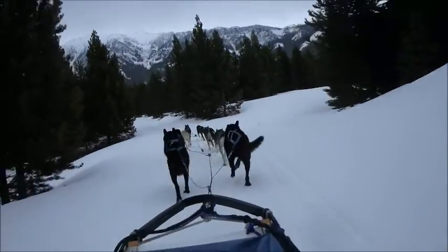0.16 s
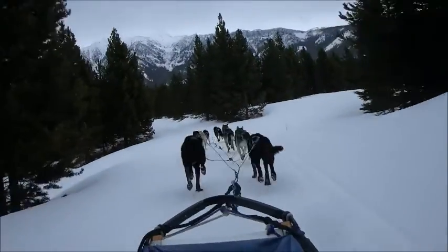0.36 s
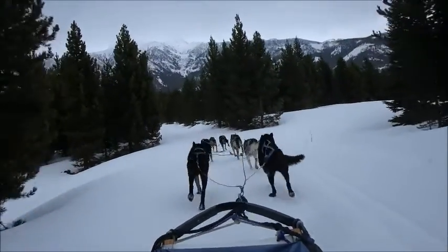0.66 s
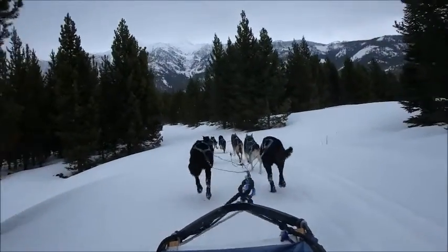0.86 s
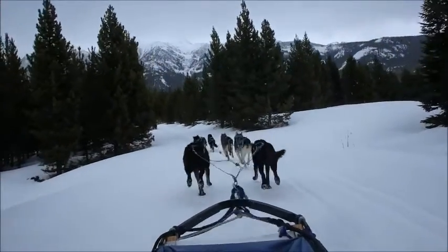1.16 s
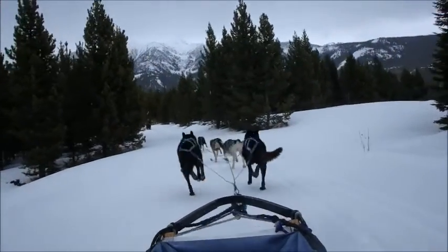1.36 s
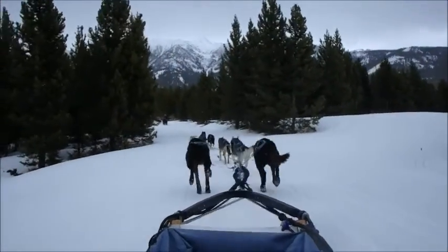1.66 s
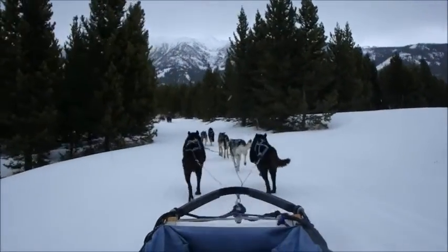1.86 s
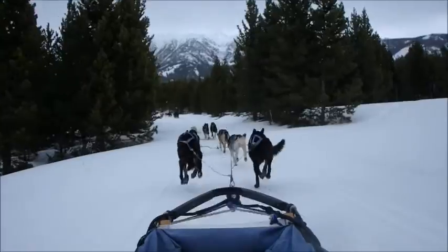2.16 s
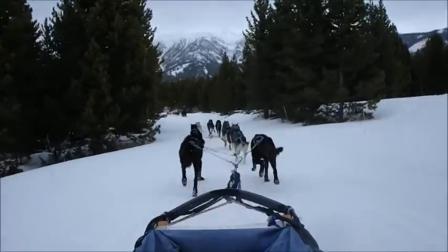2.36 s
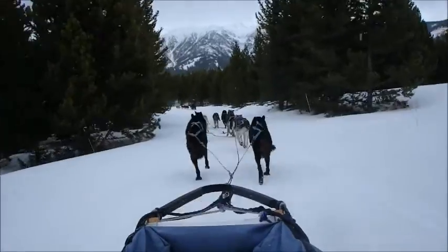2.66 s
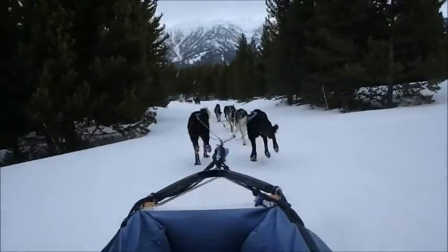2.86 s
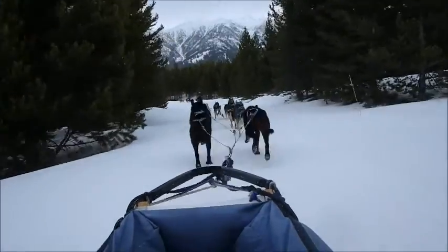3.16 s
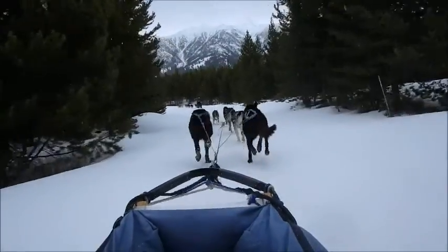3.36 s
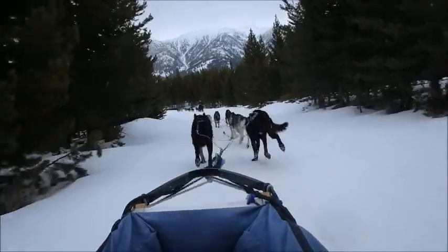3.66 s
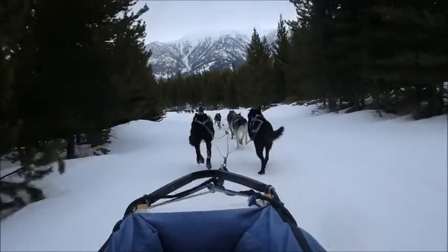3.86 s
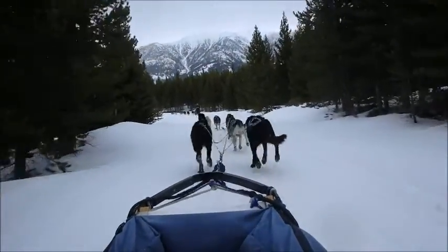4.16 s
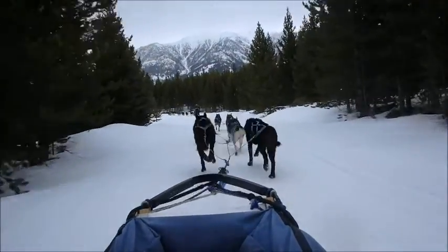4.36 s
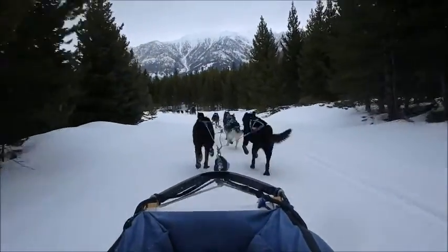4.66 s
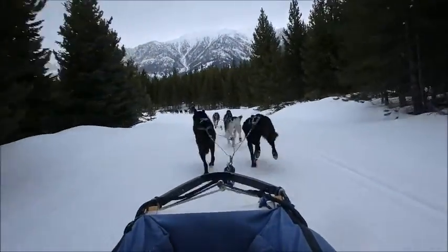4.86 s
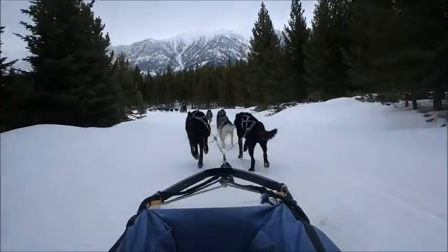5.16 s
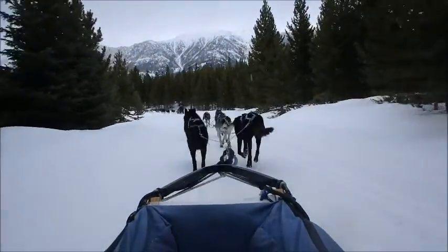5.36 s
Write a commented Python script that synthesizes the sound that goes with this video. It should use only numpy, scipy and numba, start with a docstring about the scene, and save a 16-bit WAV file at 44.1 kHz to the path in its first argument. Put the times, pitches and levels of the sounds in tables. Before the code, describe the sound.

A close, bassy sled glide on snow: steady low rumble, soft gritty scrape, irregular knocks, light clicks, and wind gusts mostly in the first half.

```python
"""Sled runners glide over packed snow: noise bands rumble in the frame, scrape and hiss, roughened by grains.
Bumps swing the frame as damped oscillations; crust crunches as puffs of band-passed noise.
Ice grains and fittings tick as bursts through resonant modes; wind buffets two ports as turbulent noise.
The steady sound climbs evenly and drops abruptly now and then. The camera held on the sled whines faintly,
notches out five narrow bands, rounds the peaks and cuts the top."""
import sys
import numpy as np
from scipy import signal
from scipy.fft import rfft, irfft, next_fast_len
from scipy.io import wavfile
from scipy.ndimage import uniform_filter1d
from numba import njit

SR = 44100
rng = np.random.default_rng(int(sys.argv[2]) if len(sys.argv) > 2 else 0)


def inscribe(sig):
    """Save sig as 16-bit PCM at rate SR to the path in sys.argv[1].

    A 1-D sig is mono; a 2-D sig holds one channel per row.
    Samples are clipped to [-1, 1] before scaling.
    """
    pcm = np.round(np.clip(np.atleast_2d(sig).T, -1, 1) * 32767)
    wavfile.write(sys.argv[1], SR, pcm.astype(np.int16))


N = 242755


def undb(db):
    """Decibel definition: 20 dB is a tenfold amplitude."""
    return 10 ** (np.asarray(db) / 20)


def unit(x):
    """Power normalisation: scale to an RMS of 1."""
    return x / np.sqrt(np.mean(x ** 2))


def along(table, hz):
    """Logarithmic frequency scale: read a (frequency_hz, value) table between its points."""
    points = np.array(table)
    return np.interp(np.log(hz), np.log(points[:, 0]), points[:, 1])


@njit
def band_pass(x, hz, width):
    """State-variable resonance: two integrators in a loop, gain 1 at the centre."""
    y, band, low = np.empty(len(x)), 0., 0.
    g, damping = np.tan(np.pi * hz / SR), width / hz
    for i in range(len(x)):
        v = (band + g * (x[i] + 1e-18 - low)) / (1 + g * (g + damping))
        band = 2 * v - band
        low = low + 2 * g * v
        y[i] = damping * v
    return y


def band_pass_twice(x, hz, width):
    """Cascaded resonance: the second pass steepens the skirts."""
    return band_pass(band_pass(x, hz, width), hz, width)


def random_levels(rate):
    """Slow random modulation: levels held 1 / rate s and slewed twice, spread near 1."""
    hold = int(SR / rate)
    steps = rng.standard_normal(N // 500)[:N // hold + 1]
    held = np.repeat(steps, hold)
    return 0.8045 * uniform_filter1d(uniform_filter1d(held, hold), hold)[:N]


def random_impulses(rate, spread_db):
    """Poisson-like process: lone impulses at random moments, some larger than the rest."""
    excess = np.minimum(rng.exponential(size=N), 3)
    return (rng.random(N) < rate / SR) * undb(spread_db * excess)


def smear(x, decay_s):
    """Exponential decay: give each impulse a tail with this time constant."""
    return signal.lfilter([1], [1, -np.exp(-1 / (decay_s * SR))], x)


# Level difference of the two ports: frequency_hz, left_minus_right_db [Hz, dB]
PORT_DIFFERENCE = [(60, -1.5), (400, -3.5), (1300, -2.5), (2600, -2), (3500, -3.5), (4300, 4), (4700, -12),
                   (5600, -0.5), (7400, -3), (9500, -2), (11000, 1.5), (13000, -3), (15000, 4)]


def port_gains(hz):
    """Interaural-style level difference: half is added on the left, half taken off on the right."""
    return undb(np.outer([.5, -.5], along(PORT_DIFFERENCE, hz)))


# Gusts on the ports: peak_s, strength_db, fall_s (to die down by 10 dB) [s, dB, s]
GUST_EVENTS = [(0.08, -22, .04), (0.18, -20.5, .03), (0.30, -17.5, 0.081), (0.439, -16.5, 0.0111),
               (0.66, -25, .04), (0.75, -24, 0.0022), (0.833, -17, 0.0552), (1.07, -17.5, .07),
               (1.447, -24, 0.1488), (1.654, -22, 0.1558), (1.796, -23.5, 0.1091), (1.985, -21, 0.1285),
               (2.235, -15.5, 0.1293), (2.42, -27, 0.109), (2.609, -23.5, 0.0711), (2.714, -21.5, 0.0424),
               (2.883, -31.5, 0.0685), (3.043, -32, 0.1181), (3.24, -31.5, 0.006)]
CALM_DB, GUST_RISE = -45, 1.038  # floor between gusts; time to rise over time to die down


def gust_strength(t):
    """Exponential growth and decay: straight slopes in dB, the strongest gust prevailing over the calm."""
    slopes = []
    for peak_s, strength_db, fall_s in GUST_EVENTS:
        distance_s = np.maximum((peak_s - t) / GUST_RISE, t - peak_s)
        slopes.append(strength_db - 10 * distance_s / fall_s)
    return np.maximum(CALM_DB, np.max(slopes, axis=0))


# Bands of turbulence: centre_hz, width_hz, level_db, growth [Hz, Hz, dB, dB per dB of gust]
WIND_BANDS = [(60.28, 63.7, -6, 0.4426), (117.84, 141.81, 4.5, 0.6342), (316.4, 263.2, -4.5, 1.301),
              (684.7, 368.9, -20, 1.625)]
GUST_DB, LEE_DB, WIND_FLUTTER_DB = -24.5, -8, 3.5  # middling gust, sheltered left port, turbulence


def wind(gust_db):
    """Turbulent pressure noise: independent eddies at each port; stronger gusts are brighter."""
    out = np.zeros((2, N))
    for port, shelter_db in zip(out, (LEE_DB, 0)):
        flutter_db = WIND_FLUTTER_DB * random_levels(45)
        for hz, width, db, growth in WIND_BANDS:
            eddies = unit(band_pass_twice(rng.standard_normal(N), hz, width))
            band_db = GUST_DB + growth * (gust_db - GUST_DB) + db
            port += undb(band_db + shelter_db + flutter_db) * eddies
    return out


WHINE_HZ, WHINE_DB = 14835, -68  # RMS level, before the climb and drops


def whine(t):
    """Pure tone: the camera's faint steady sinusoid, alike in both ports."""
    return np.sqrt(2) * undb(WHINE_DB) * np.sin(2 * np.pi * WHINE_HZ * t)


# Modes excited by a tick, low to high: centre_hz, width_hz, burst_decay_s [Hz, Hz, s]
TICK_RESONANCES = [ (2475.6, 1291.8, 0.001121), (3538.9, 1262, 0.0012164), (6430, 4075.5, 0.0009325),
                   (11176, 13360, 0.001176)]
TICK_RING_HZ, TICK_RING_WIDTH_HZ, TICK_RING_DB = 3899.5, 203.3, -8


def tick_resonance(excite):
    """Modal resonance: each mode filters its own burst, and the camera shell rings with the sum."""
    sound = 0
    for x, (hz, width, _) in zip(excite, TICK_RESONANCES):
        # a narrow mode passes less of its burst, so restore the strength of the blow
        sound = sound + np.sqrt(SR / width) * band_pass_twice(x, hz, width)
    return sound + undb(TICK_RING_DB) * band_pass(sound, TICK_RING_HZ, TICK_RING_WIDTH_HZ)


# Loud ticks: start_s, blow_db, centre_hz, spread_octaves (from the centre to 10 dB down),
# left_minus_right_db [s, dB, Hz, octaves, dB]
LOUD_TICKS = [(0.0354, -42, 6200, 0.98, -1.0), (0.0409, -33, 5200, 0.94, -2.0),
              (0.221, -36, 8700, 3.0, -6.0), (0.4688, -35, 3300, 0.99, -1.0),
              (0.5205, -32, 1900, 1.46, -1.0), (0.5288, -33, 5000, 1.43, -2.0),
              (0.6042, -37, 3500, 1.58, -4.0), (0.6422, -24, 1700, 1.35, -3.0),
              (0.6796, -32, 1700, 2.39, -2.0), (0.7069, -25, 1700, 1.66, -2.0),
              (0.7524, -22, 4300, 0.96, 0.4), (0.7655, -33, 3400, 3.0, -5.0), (0.78, -34, 5900, 1.6, -1.0),
              (0.7967, -23, 4200, 1.04, 4.0), (0.8181, -35, 1800, 3.0, -9.0),
              (0.9103, -31, 5500, 0.85, 2.0), (1.0126, -26, 1800, 3.0, -2.0),
              (1.0191, -33, 2000, 2.68, -3.0), (1.0269, -27, 1700, 1.92, 2.0),
              (1.086, -28, 1700, 1.88, -2.0), (1.09, -31, 5300, 1.6, 1.0), (1.1325, -37, 5300, 1.29, -1.0),
              (1.1694, -29, 2300, 1.77, 0.4), (1.1845, -32, 3800, 1.98, -1.0),
              (1.2074, -23, 2500, 1.4, -2.0), (1.302, -39, 2900, 1.65, 2.0), (1.3156, -36, 2000, 3.0, 0.4),
              (1.4928, -32, 4200, 1.73, -4.0), (1.5295, -37, 4300, 1.32, -1.0),
              (1.6748, -20, 1700, 1.67, -1.0), (1.687, -33, 1700, 2.2, -2.0), (1.759, -36, 7300, 1.4, -1.0),
              (1.8425, -33, 8000, 1.73, -2.0), (1.8509, -30, 1700, 1.81, -1.0),
              (1.9112, -26, 5700, 0.95, -13.0), (1.9785, -32, 1700, 2.58, -3.0),
              (2.2164, -32, 5200, 1.21, 1.0), (2.2727, -36, 7500, 2.42, -3.0),
              (2.5369, -35, 2800, 3.0, -3.0), (2.5581, -27, 3000, 2.65, -1.0),
              (2.5695, -34, 5600, 2.02, -6.0), (2.6601, -32, 1700, 2.62, -2.0),
              (2.7974, -18, 7500, 3.0, 1.0), (2.9944, -32, 4800, 1.0, -10.0),
              (3.1785, -37, 4500, 1.57, -4.0), (3.3458, -29, 3400, 0.96, -2.0),
              (3.4567, -23, 1700, 1.18, -5.0), (3.6661, -19, 13300, 1.97, 11.0),
              (3.857, -36, 3600, 1.4, -2.0), (3.892, -37, 4100, 1.79, -3.0), (3.94, -37, 7500, 3.0, -8.0),
              (4.1515, -33, 4600, 3.0, -6.0), (4.2587, -30, 3800, 1.32, -2.0),
              (4.29, -29, 6500, 1.07, -5.0), (4.3157, -24, 2900, 1.08, -1.0),
              (4.3218, -24, 13300, 2.61, 1.0), (4.3499, -31, 8300, 2.48, -2.0),
              (4.3542, -32, 4700, 1.84, -2.0), (4.3628, -27, 1700, 2.22, -2.0),
              (4.3897, -30, 3000, 1.35, 0.4), (4.3965, -26, 2000, 1.56, -2.0),
              (4.4041, -32, 4100, 1.24, -1.0), (4.4663, -16, 12700, 2.09, -5.0),
              (4.4712, -27, 13100, 1.55, 0.4), (4.5509, -28, 6300, 0.82, -3.0),
              (4.6412, -27, 1700, 2.66, 0.4), (4.6661, -27, 1700, 2.05, -3.0),
              (4.7034, -27, 1700, 2.25, 2.0), (4.7517, -30, 3400, 3.0, -1.0),
              (5.0629, -33, 3400, 1.48, -3.0)]
# How readily each mode answers a loud tick: level_db [dB]
TICK_RESPONSE_DB = [0.8, -1.5, -3.5, -8]
# How strongly the crackle drives each mode: level_db [dB]
CRACKLE_RESPONSE_DB = [-1, -5, -7, -15]
# Port-specific noise against shared noise in each mode: amplitude_ratio [1]
TICK_UNSHARED = [0.4, 0.85, 1.2, 1.5]
TICK_SNAP = 3.4295  # first impulse over the burst
CRACKLE_RATE, CRACKLE_DB, CRACKLE_SPREAD_DB = 70, -45.5, 2.2  # small ticks per s, least blow, spread
CRACKLE_COLOUR_DB = 3.5  # random change of each mode


def ticks(spray_db):
    """Impulse excitation: listed loud blows, and a crackle of small ones that follows the spray."""
    start_s, blow_db, centre_hz, spread, pan_db = np.transpose(LOUD_TICKS)
    octaves = np.log2(np.array(TICK_RESONANCES)[:, :1] / centre_hz)
    modes_db = blow_db + np.array(TICK_RESPONSE_DB)[:, None] - 10 * (octaves / spread) ** 2
    at = (start_s * SR).astype(int)
    small = random_impulses(CRACKLE_RATE, CRACKLE_SPREAD_DB)
    small = small * undb(CRACKLE_DB + spray_db - spray_db.mean())
    colour, shared, *own = rng.standard_normal((4, len(TICK_RESONANCES), N))
    colour_db = CRACKLE_COLOUR_DB * np.clip(colour, -2, 2) + np.array(CRACKLE_RESPONSE_DB)[:, None]
    apart = np.array(TICK_UNSHARED)[:, None]
    out = []
    for side, noise in zip((.5, -.5), own):
        blows = small * undb(colour_db)
        blows[:, at] = undb(modes_db + side * pan_db)
        bursts = np.array([smear(b, decay) for b, (_, _, decay) in zip(blows, TICK_RESONANCES)])
        rattle = (np.sign(shared) + apart * np.sign(noise)) / np.sqrt(1 + apart ** 2)
        out.append(tick_resonance(bursts * rattle + TICK_SNAP * blows))
    return np.array(out)


# Lumps of crust breaking under a runner: start_s, peak_db (before the port gains), centre_hz [s, dB, Hz]
CRUST_BREAKS = [(0.173, -23.5, 575), (0.522, -24, 608), (0.583, -22, 533.5), (0.601, -24, 654),
                (0.638, -22.5, 657), (1.159, -22.5, 455.8), (1.782, -25, 651), (1.85, -16.5, 527.4),
                (1.95, -18.5, 521.7), (1.999, -16.5, 641.7), (2.136, -19, 715.4), (2.203, -15, 461.7),
                (2.527, -18, 588.6), (2.669, -20, 711), (2.838, -22, 630.6), (2.88, -19.5, 598),
                (2.997, -17, 452.2), (3.453, -23.5, 619.8), (3.927, -26, 646), (4.14, -22.5, 634.6),
                (4.414, -18.5, 768.5), (4.628, -20, 451), (5.049, -24, 630), (5.202, -15.5, 459.5),
                (5.275, -18.5, 553.7)]
CRUNCH_WIDTH, CRUNCH_S = 0.91, 0.0044106  # bandwidth over centre; time to swell to the full


def crunches():
    """Brittle fracture: each lump gives a dull puff of band-passed noise, swelling and fading."""
    out, t = np.zeros(N + SR), np.arange(SR // 10) / SR
    envelope = t * np.exp(-t / CRUNCH_S)
    noise = rng.standard_normal((len(CRUST_BREAKS), len(t)))
    for (start_s, peak_db, hz), burst in zip(CRUST_BREAKS, noise):
        puff = band_pass_twice(burst * envelope, hz, CRUNCH_WIDTH * hz)
        i = int(start_s * SR)
        out[i:i + len(t)] += undb(peak_db) * puff / np.max(np.abs(puff))
    return out[:N] * port_gains(713)


# Bumps in the trail: swell_s (near the fullest swing), peak_db (before the port gains), pitch_hz [s, dB, Hz]
TRAIL_BUMPS = [(0.123, -8, 116), (0.349, -14, 113), (0.468, -10, 122.6), (0.528, -14, 210),
               (0.572, -11.5, 209.8), (0.651, -14, 128), (0.818, -14.5, 124.8), (1.048, -10, 125.3),
               (1.107, -9.5, 166.5), (1.419, -13.5, 147), (1.519, -10, 205.2), (1.78, -8, 136),
               (1.842, -6.5, 187), (1.948, -11.5, 115.5), (2.279, -9.5, 157.9), (2.348, -14, 209),
               (2.473, -13.5, 137.6), (2.687, -14, 207), (2.891, -5, 115.3), (2.949, -7.5, 131.7),
               (3.093, -14, 173), (3.449, -13.5, 112), (3.697, -7.5, 149.2), (3.827, -8, 119.9),
               (3.87, -9, 139.8), (4.099, -8.5, 131.1), (4.32, -10, 215.5), (4.421, -14, 143),
               (4.501, -9.5, 150.3), (4.798, -14, 223.8), (4.891, -9, 165.2), (5.043, -10.5, 119.6),
               (5.103, -6, 173.4), (5.178, -6.5, 135), (5.279, -12, 153.5), (5.399, -10, 182),
               (5.461, -12.5, 139.3)]
JOLT_RISE_S, JOLT_T60_S = 0.0079887, 0.059894  # start ahead of swell_s; 60 dB time of the exponential


def jolts():
    """Damped oscillation: each bump swings the frame for a few cycles, swelling over the first."""
    out, t = np.zeros(N + SR), np.arange(SR // 5) / SR
    envelope = t * np.exp(-np.log(1000) * t / JOLT_T60_S)
    for swell_s, peak_db, hz in TRAIL_BUMPS:
        swing = envelope * np.sin(2 * np.pi * hz * t)
        i = int((swell_s - JOLT_RISE_S) * SR)
        out[i:i + len(t)] += undb(peak_db) * swing / np.max(np.abs(swing))
    return out[:N] * port_gains(160)


# Sudden drops of all the steady sound: start_s, depth_db [s, dB]
LEVEL_DROPS = [(1.119, 4.5), (1.52, 1.5), (1.868, 3), (2.2, 2), (2.288, 4), (2.89, 3.5), (3.045, 5.5),
               (4.45, 3.5), (4.6, 3), (5.18, 2.5), (5.402, 5)]
START_DB, CLIMB_DB_PER_S, DROP_S = -6.9, 8, 0.00577  # DROP_S: how long a drop takes


def climb_and_drops(t):
    """Sawtooth-like level modulation: an even climb in dB, cut back at each drop."""
    db = START_DB + CLIMB_DB_PER_S * t
    for start_s, depth_db in LEVEL_DROPS:
        db = db - depth_db * (t > start_s)
    return uniform_filter1d(db, int(DROP_S * SR))


# Runners on the trail, before the climb and drops: time_s, rumble_db, scrape_db, spray_db [s, dB, dB, dB]
RUNNER_LEVELS = [(0, -17, -33.5, -49), (0.1, -18.5, -28, -50.5), (0.52, -16.5, -36, -53.5),
                 (0.7, -18, -33.5, -52.5), (0.85, -19.5, -35, -54), (1.08, -17.5, -34.5, -52),
                 (1.3, -16.5, -32.5, -53), (1.75, -19, -33.5, -54), (1.95, -18.5, -27, -54),
                 (2.2, -17.5, -24, -53), (2.45, -17.5, -25, -53), (2.75, -18, -27, -53),
                 (3.05, -13, -26.5, -52), (3.3, -14, -29, -54), (3.6, -14.5, -28.5, -52),
                 (3.75, -20, -31, -53), (3.95, -18, -28.5, -54), (4.22, -20, -34.5, -55),
                 (4.4, -21, -32.5, -54), (4.55, -14.5, -28.5, -52), (4.72, -19, -29.5, -51),
                 (4.9, -19, -31, -53), (5.1, -19.5, -31, -54), (5.35, -19, -29, -52.5),
                 (5.5, -14, -28, -51)]
# Deepest shaking of the sled, before the climb and drops: time_s, level_db [s, dB]
SWAY_LEVELS = [(0.0, -27), (0.07, -16), (0.45, -23), (0.69, -37), (0.87, -27.5), (1.35, -32), (1.55, -26),
               (2.45, -36), (2.64, -22), (2.82, -33), (3.25, -27), (3.68, -34), (3.95, -28.5), (4.91, -35),
               (5.2, -32), (5.5, -38)]
HISS_DB, HISS_PER_SCRAPE, SCRAPE_DB = -43, 0.421, -31  # hiss at a middling scrape; dB per dB; that scrape
SWISH_S, SWISH_HALF_S, SWISH_DB = 4.94, .035, 7  # soft treble swish: middle, half length, rise of the spray


def runner_levels(t):
    """Friction strength: sway, rumble, scrape, hiss and spray in dB; the hiss grows with the scrape."""
    time_s, *columns = np.transpose(RUNNER_LEVELS)
    rumble_db, scrape_db, spray_db = (np.interp(t, time_s, c) for c in columns)
    sway_db = np.interp(t, *np.transpose(SWAY_LEVELS))
    hiss_db = HISS_DB + HISS_PER_SCRAPE * (scrape_db - SCRAPE_DB)
    spray_db = spray_db + SWISH_DB * np.exp(-((t - SWISH_S) / SWISH_HALF_S) ** 2)
    return [sway_db, rumble_db, scrape_db, hiss_db, spray_db]


# Sway, rumble, scrape, hiss, spray: top_hz, flicker_db, flicker_rate_per_s, grain_share [Hz, dB, 1/s, 0-1]
GLIDE_LAYERS = [(85, 0, 3.33, 0.1), (330, 0.8, 10, 0.07), (2200, 0.8613, 18, 0.16), (4400, 0.7, 25, 0.1),
                (15000, 0.5, 58, 0)]
# Spectrum of sway, rumble and scrape: frequency_hz, density_db [Hz, dB per Hz]
BODY_SPECTRUM = [(18, -27.5), (30, -32), (50, -17.5), (75, -16), (100, -6.5), (130, -0.5), (175, -3.5),
                 (215, -2), (270, -9.5), (340, -16.5), (520, -22), (650, -19), (910, -29.5), (1100, -28),
                 (1570, -32.5), (2100, -42)]
# Spectrum of hiss and spray: frequency_hz, density_db [Hz, dB per Hz]
SNOW_SPECTRUM = [(2100, -14), (2320, 2.5), (2800, 2.5), (3300, -3.5), (3850, -2), (4300, -7), (4700, -17),
                 (5800, -4.5), (6300, -16), (7300, -9.5), (9500, -15.5), (12500, -18.5), (14700, -21.5),
                 (16500, -36)]
# Likeness of the two ports: frequency_hz, likeness [Hz, 0-1]
PORT_LIKENESS = [(30, 0.88), (60, 0.95), (130, 0.99), (300, 1), (800, 1), (1400, 1), (2600, 0.96),
                 (3500, 0.95), (4200, 0.57), (6800, 0.93), (8500, 0.22), (10000, 0.27), (12000, 0),
                 (14500, 0.62)]
LEAD_S = .000012  # the left port is nearer the runners
GRAIN_RATE, GRAIN_SPREAD_DB, GRAIN_S = 360, 7, 0.0008037  # crushes per s, spread of size, decay


def glide(levels_db):
    """Sliding friction: third-octave noise bands, roughened by crushed grains, each layer at its own level."""
    size = next_fast_len(N)
    f = np.maximum(np.arange(size // 2 + 1) * SR / size, 1)
    # the snow spectrum continues from the end of the body spectrum
    snow_db = along(SNOW_SPECTRUM, f) - SNOW_SPECTRUM[0][1] + BODY_SPECTRUM[-1][1]
    colour = undb(np.where(f < SNOW_SPECTRUM[0][0], along(BODY_SPECTRUM, f), snow_db))
    like = np.clip(along(PORT_LIKENESS, f), 0, 1)
    ports = port_gains(f) * np.exp(2j * np.pi * np.outer([LEAD_S, 0], f))
    # one crush excites all bands at once
    grains = unit(smear(random_impulses(GRAIN_RATE, GRAIN_SPREAD_DB), GRAIN_S))
    centres = 25 * 2 ** (np.arange(29) / 3)
    out, low = 0, 0
    for (top, flicker_db, rate, share), db in zip(GLIDE_LAYERS, levels_db):
        layer, shared, share = 0, random_levels(rate / 2), np.clip(share, 0, 1)
        roughness = np.sqrt(1 - share + share * grains ** 2)
        for hz in centres[(centres >= low) & (centres < top * 1.1)]:
            strength = undb(flicker_db * (shared + random_levels(rate))) * roughness
            mid, side = rfft(strength * rng.standard_normal((2, N)), size)
            band = colour * np.cos(np.pi / 2 * np.clip(3 * np.log2(f / hz), -1, 1))
            opposed = side * np.array([[1], [-1]])
            layer = layer + band * (np.sqrt(1 + like) * mid + np.sqrt(1 - like) * opposed)
        layer = irfft(layer * ports, size)[:, :N]
        out = out + undb(db) * layer / np.std(layer.mean(axis=0))
        low = top * 1.1
    return out


def scene():
    """Superposition: the climb and drops scale glide and whine, and their level also drives the crackle."""
    t = np.arange(N) / SR
    levels_db = runner_levels(t)
    spray_db, swell_db = levels_db[-1], climb_and_drops(t)
    steady = undb(swell_db) * (glide(levels_db) + whine(t))
    return wind(gust_strength(t)) + ticks(spray_db + swell_db) + crunches() + jolts() + steady


# Narrow bands taken out by the camera: centre_hz, width_hz [Hz, Hz]
CAMERA_NOTCHES = [(2207, 296.26), (3105, 312), (4104, 94.8), (5105, 62.1), (6110, 83.9)]
MIC_TOP_HZ, TOP_HZ = 15200, 16300  # microphone roll-off, final cut
KNEE, CEILING = .6, .87  # amplitude where rounding starts, and its limit


def record(dry):
    """Filtering and saturation: five notches, microphone roll-off, rounded peaks and the cut at the top."""
    for hz, width in CAMERA_NOTCHES:
        dry = dry - np.array([band_pass(x, hz, width) for x in dry])
    roll_off = signal.cheby1(N=5, rp=1, Wn=MIC_TOP_HZ, fs=SR, output="sos")
    dry = signal.sosfilt(roll_off, dry)
    straight = np.clip(dry, -KNEE, KNEE)
    rounded = straight + (CEILING - KNEE) * np.tanh((dry - straight) / (CEILING - KNEE))
    top_cut = signal.ellip(8, .2, 70, TOP_HZ, fs=SR, output="sos")  # ripple dB, rejection dB
    return signal.sosfilt(top_cut, rounded)


dry = scene()
out = record(dry)
inscribe(out)
```